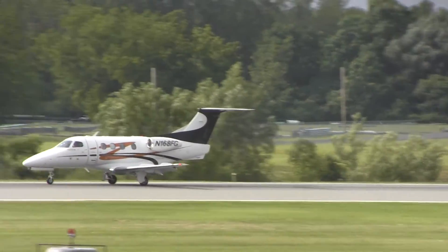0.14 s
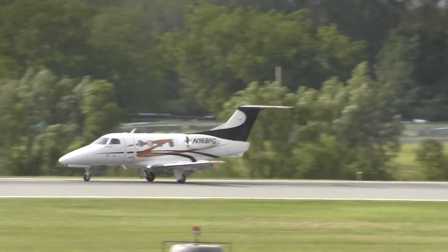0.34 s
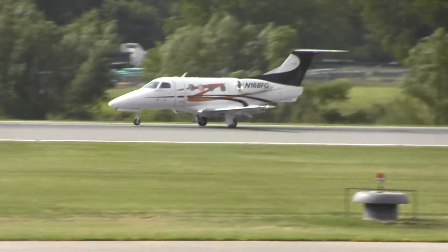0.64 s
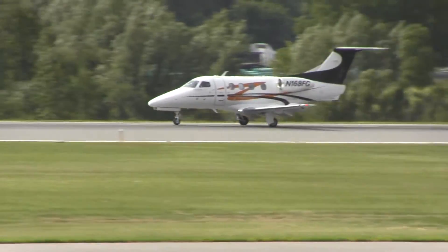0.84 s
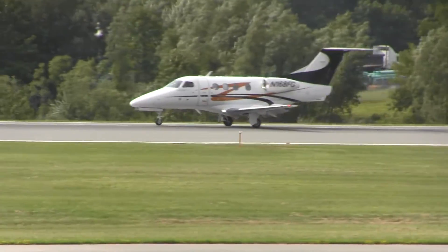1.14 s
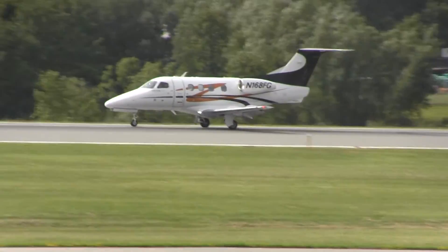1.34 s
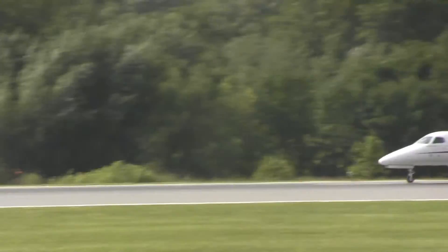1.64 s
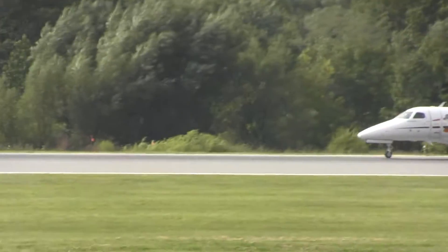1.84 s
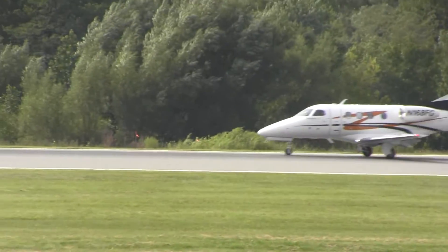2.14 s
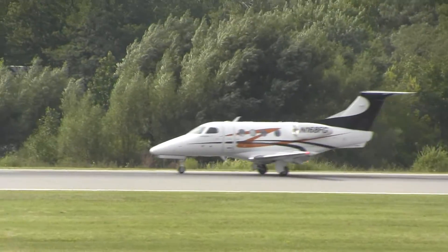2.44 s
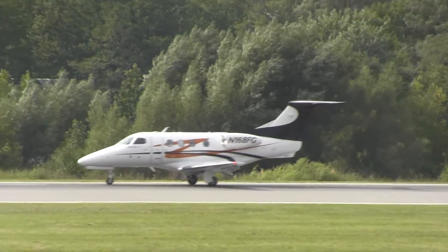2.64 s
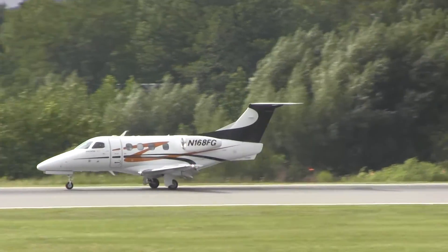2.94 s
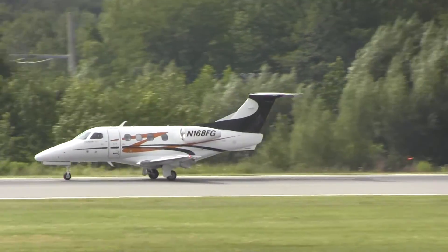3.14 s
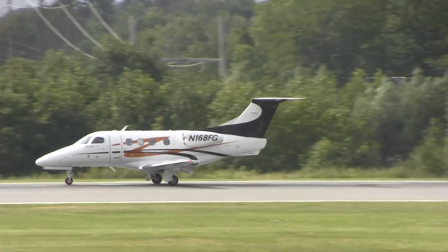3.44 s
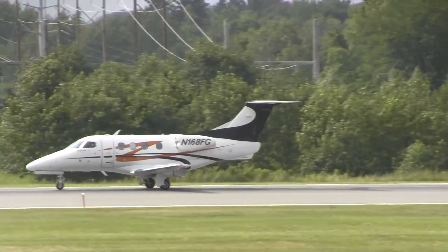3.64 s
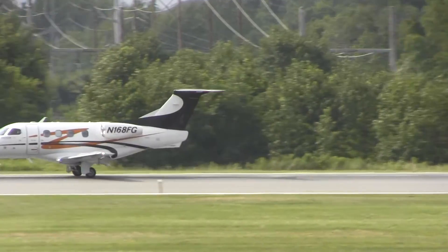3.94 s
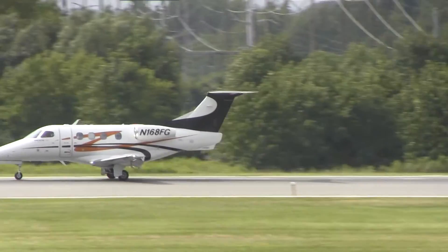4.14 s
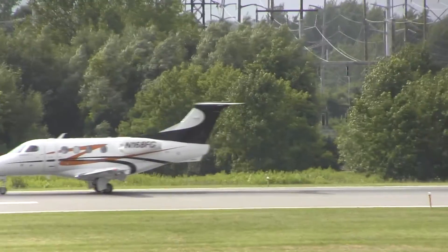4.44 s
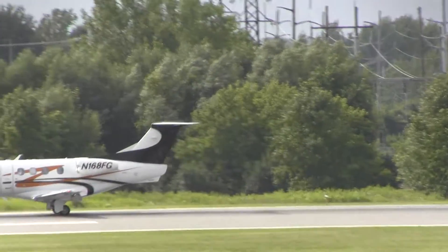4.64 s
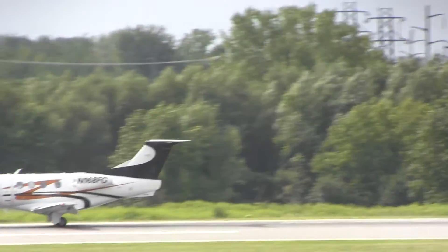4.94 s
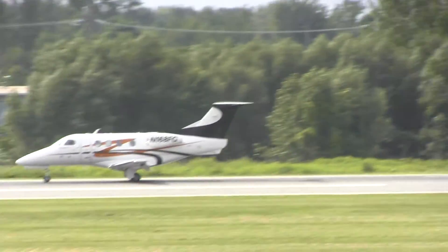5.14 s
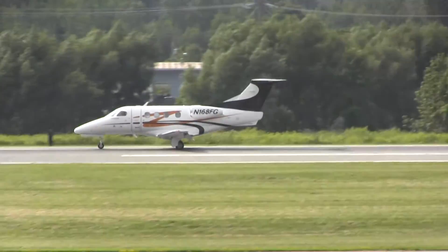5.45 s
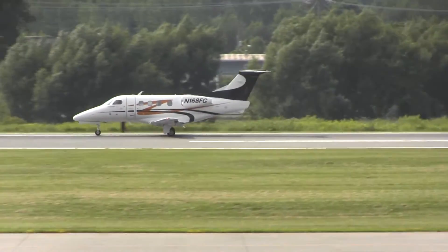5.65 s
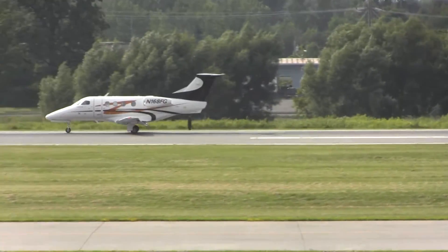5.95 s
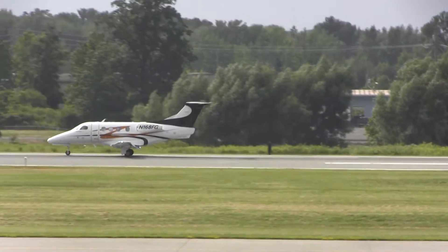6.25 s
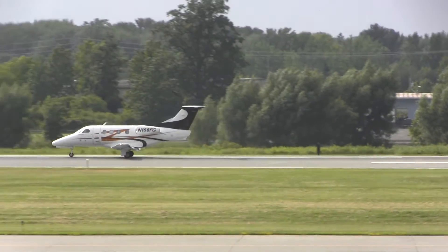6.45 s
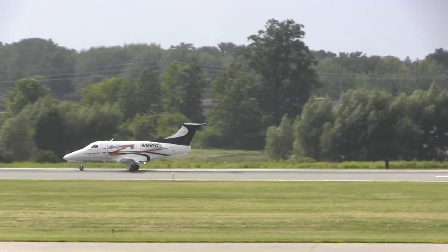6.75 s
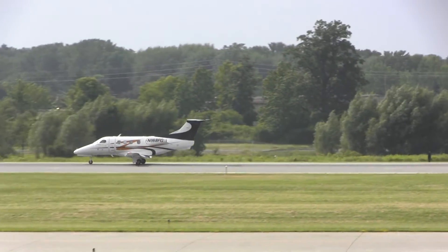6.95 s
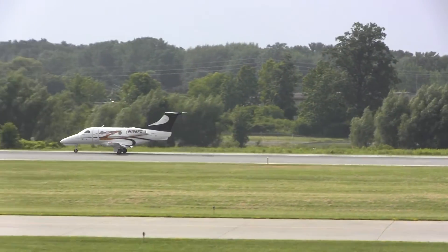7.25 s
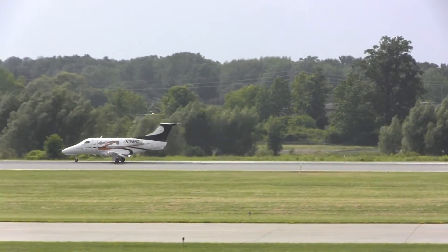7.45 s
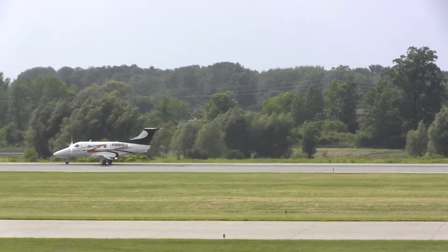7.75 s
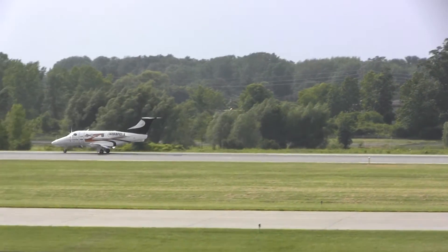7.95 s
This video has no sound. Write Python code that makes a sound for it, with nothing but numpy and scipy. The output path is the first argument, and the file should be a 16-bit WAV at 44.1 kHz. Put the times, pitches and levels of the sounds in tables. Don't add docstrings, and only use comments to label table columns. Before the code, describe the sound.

A small twin jet rolls away along a runway, heard across open grass through a stereo camera microphone. From 0 to 1.6 seconds its fan roar is faint and airy beneath low wind rumble and slight hiss. Around 1.8 to 2.5 it surges bright and rushing, with a twinkling whine near 5.6 kilohertz, then ebbs by 3.3. Hard wind thumps strike at about 3.6, with a tiny click on the right, and a shorter gust follows near 4.3 as the bass becomes central. The roar gradually recovers, peaking around 5.9 with a piercing, fluttering whine, now slightly lower. From 6.3 to 6.7 the heaviest gusts pound and snap, with another faint right click. The jet dips around 7.2, then its roar and whine swell again, shimmering until the cut at about 8.1, over lighter buffeting.

```python
import sys
import numpy as np
from scipy import signal
from scipy.fft import rfft, irfft, next_fast_len
from scipy.io import wavfile
from scipy.ndimage import map_coordinates

SR = 44100
rng = np.random.default_rng(int(sys.argv[2]) if len(sys.argv) > 2 else 0)


def unload_audio(sound):
    columns = np.transpose(np.atleast_2d(sound))
    steps = np.round(np.clip(columns, -1, 1) * 32767)
    wavfile.write(sys.argv[1], SR, steps.astype(np.int16))


def gain_from_db(level_db):
    decades = np.asarray(level_db, float) / 20
    return 10 ** decades


N = 356769


def unit(x):
    return x / np.sqrt(np.mean(np.abs(x) ** 2) + 1e-20)


def along(points, hz):
    point_hz, value = np.transpose(points)
    return np.interp(np.log(hz + 1), np.log(point_hz + 1), value)


def curves(rows, t=None):
    s, *columns = np.transpose(rows)
    t = np.arange(N) / SR if t is None else t
    return [np.interp(t, s, column) for column in columns]


def bumps(t, s, half_s):
    return np.exp(-.5 * ((t[:, None] - s) / half_s) ** 2).T


def wobble(rate_hz):
    knots = np.arange(N) * np.clip(rate_hz, 0, 120) / SR
    return map_coordinates(rng.standard_normal(1000), [knots])


def noise(spectrum):
    m = next_fast_len(N)
    gain = gain_from_db(along(spectrum, np.fft.rfftfreq(m, 1 / SR)))
    return unit(irfft(rfft(rng.standard_normal(m)) * gain, m)[:N])


def patches(shape, bins, frames):
    kernel = np.outer(np.hanning(bins), np.hanning(frames))
    return unit(signal.fftconvolve(rng.standard_normal(shape), kernel, "same"))


def filtered(x, cut_hz, kind="low"):
    return signal.sosfiltfilt(signal.butter(2, cut_hz, kind, fs=SR, output="sos"), x)


# low_hz, high_hz
BANDS = [
    (900, 2000),
    (2300, 3400),
    (3500, 5200),
    (6000, 11000),
]
# abeam_db, astern_db
BAND_DB = [
    (-7, -4),
    (-4.5, -6.5),
    (-2, -2),
    (-9.5, -10),
]
# freq_hz, density_db_per_hz
ABEAM = [(290, -63), (500, -15.5), (1100, -3.5), (2100, -6), (2550, -0.5), (3350, -1), (4300, -0.5),
         (5800, -3.5), (6400, -11.5), (7500, -16.5), (8500, -19), (10300, -31), (12500, -48.5),
         (16000, -120)]
# freq_hz, density_db_per_hz
ASTERN = [(290, -55), (550, -23.5), (800, -11), (1300, -10), (2100, -5.5), (2450, 3), (3200, -5),
          (4600, -6), (5600, -7.5), (7200, -22.5), (8300, -23.5), (10200, -33), (12500, -50.5),
          (16000, -120)]
# centre_hz, width_hz, abeam_db, astern_db
DUCT = [(1293, 75, 2, 8), (1940, 36, 0.5, 0.5), (2434, 50, 1, 1.5), (6740, 70, 3, 6), (2248, 107, -3, -10),
        (2620, 120, 4, -3.5), (3804, 160, 4.5, 1.5), (3580, 83, -1.5, 3), (4560, 130, 3, 1.5)]
# freq_hz, level_db
SPREAD = [(1500, -34), (2350, -20), (3300, -28), (5700, -23.5), (7300, -25.5), (8300, -13), (9800, -15),
          (11500, -26)]
# time_s, astern_share (0-1)
TURN = [
    (3.1, 0.23),
    (4.9, 0.79),
]
# time_s, bass_share (0-1), middle_share (0-1)
FOLD = [
    (4.12, 0, 0),
    (4.25, .95, 0),
    (6.65, .95, 0),
    (6.75, .95, .7),
]


def roar():
    hz, t, z = signal.stft(rng.standard_normal((2, N)), SR, nperseg=512, noverlap=384)
    hz = hz[:, None]
    astern = curves(TURN, t)[0]
    colour_db = along(ABEAM, hz) * (1 - astern) + along(ASTERN, hz) * astern
    for centre_hz, width_hz, abeam_db, astern_db in DUCT:
        peak_db = abeam_db * (1 - astern) + astern_db * astern
        colour_db = colour_db + peak_db * np.exp(-.5 * ((hz - centre_hz) / width_hz) ** 2)

    power = gain_from_db(2 * colour_db)
    band_db = [10 * np.log10(np.mean(power * ((hz >= lo) & (hz < hi)), axis=0)) for lo, hi in BANDS]
    fade_db = np.array(BAND_DB) @ [1 - astern, astern] - band_db
    log_centres = np.log([np.sqrt(lo * hi) for lo, hi in BANDS])
    place = np.interp(np.log(hz[:, 0] + 1), log_centres, np.arange(len(BANDS)))
    below = np.minimum(place.astype(int), len(BANDS) - 2)
    rise_db = fade_db[below + 1] - fade_db[below]
    fade_db = fade_db[below] + (place - below)[:, None] * rise_db

    scatter_db = 1.88 * patches(colour_db.shape, bins=10.6, frames=23.7)
    scatter_db = scatter_db + 0.85 * patches(colour_db.shape, bins=71, frames=12.3)
    gain = gain_from_db(colour_db + fade_db + path(hz, t) + scatter_db - 1.64)
    fan_db = (1 - 5 * astern) * (hz > 4000) * (hz < 7300)
    width = gain_from_db(along(SPREAD, hz) + fan_db) * (1 - curves(FOLD, t)[1] * (hz < 6400))
    return signal.istft(z * [gain, gain * width], SR, nperseg=512, noverlap=384)[1][:, :N]


# time_s, pitch_hz
BLADE_HZ = [(0, 5655), (.6, 5636), (1.8, 5599), (2.2, 5585), (3, 5543), (3.8, 5503), (4.6, 5481),
            (5.8, 5441), (6.2, 5413), (7, 5390), (8.09, 5355)]
# blade_tone_multiple, abeam_db, astern_db (over the high fan band), blur_hz
SIDEBANDS = [(.9555, -20, -24, 12), (1.0445, -27, -27, 12), (.765, -14, -18, 45), (1.2345, -36, -27, 30),
             (1.469, -29, -29, 60)]


def whine():
    def twinkle(steady, rate_hz, scatter=1):
        return unit(steady + scatter * (wobble(rate_hz) + 1j * wobble(rate_hz)))

    hz = curves(BLADE_HZ)[0]
    phase = 2 * np.pi * np.cumsum(hz) / SR
    band = gain_from_db(arriving(hz.mean()))
    astern = curves(TURN)[0]
    tone = flares() * twinkle(1, 95, 0.36 - 0.25 * astern) * np.exp(1j * phase)
    for multiple, abeam_db, astern_db, blur_hz in SIDEBANDS:
        level_db = abeam_db + astern * (astern_db - abeam_db) + 2.5
        sideband = twinkle(0.27, 2 * blur_hz) * np.exp(1j * multiple * phase)
        tone = tone + band * gain_from_db(level_db) * sideband
    return np.array([tone.real, gain_from_db(-28) * tone.imag])


# time_s, half_length_s, peak_db
FLARES = [(0.406, 0.055, -47.5), (0.946, 0.055, -50), (1.402, 0.059, -48.6), (1.616, 0.038, -46),
          (1.8, 0.055, -33.5), (1.911, 0.061, -40), (1.976, 0.012, -29), (2.036, 0.03, -31.5),
          (2.19, 0.052, -34), (2.325, 0.062, -45), (2.405, 0.012, -28.5), (2.51, 0.023, -36),
          (2.6, 0.025, -39), (2.719, 0.059, -41.4), (2.965, 0.055, -34), (3.457, 0.055, -51),
          (3.936, 0.059, -39.5), (4.163, 0.055, -49), (4.405, 0.06, -47), (4.702, 0.069, -41),
          (4.909, 0.055, -48), (5.23, 0.055, -43), (5.368, 0.018, -48), (5.502, 0.038, -39),
          (5.618, 0.013, -33), (5.675, 0.014, -31), (5.735, 0.013, -28), (5.797, 0.013, -25.5),
          (5.867, 0.012, -24.5), (5.882, 0.047, -41), (6.006, 0.013, -30), (6.066, 0.018, -29.5),
          (6.175, 0.01, -33), (6.22, 0.049, -29), (6.276, 0.012, -33), (6.325, 0.02, -36),
          (6.44, 0.013, -44), (6.49, 0.011, -27), (6.45, 0.03, -38), (6.538, 0.01, -31.5),
          (6.595, 0.012, -33), (6.695, 0.035, -36), (6.81, 0.038, -39), (6.882, 0.011, -36),
          (6.955, 0.047, -41.5), (7.022, 0.018, -36), (7.11, 0.018, -41), (7.17, 0.023, -36.5),
          (7.27, 0.022, -39), (7.31, 0.014, -39), (7.37, 0.013, -34), (7.47, 0.028, -31.5),
          (7.62, 0.063, -28.5), (7.67, 0.01, -30), (7.752, 0.052, -30), (7.91, 0.042, -27.5),
          (7.987, 0.036, -27.5), (8.066, 0.026, -20.5)]
DROPOUTS = [2.09, 2.105, 2.465, 5.76, 6.11, 6.23, 6.56, 6.635, 6.74, 7.06, 7.22, 7.35, 7.4, 7.52, 7.55,
            7.74, 7.8, 8.03]


def flares(dropout_s=.007, dropout_share=.65):
    t = np.arange(0, N / SR + .01, .002)
    s, half_s, peak_db = np.transpose(FLARES)
    kept = np.prod(1 - dropout_share * bumps(t, np.array(DROPOUTS), dropout_s), axis=0)
    size = kept * (gain_from_db(peak_db) @ bumps(t, s, half_s))
    return curves(np.c_[t, size])[0]


# time_s, roar_db
PATH = [(0.0, -38.5), (1.6, -38.5), (1.9, -21.5), (2.1, -28.5), (2.4, -25), (2.68, -32.5), (3.0, -29.5),
        (3.24, -38), (3.64, -41), (3.92, -40.5), (4.56, -35), (4.72, -33), (5.04, -38.0), (5.52, -33.5),
        (5.88, -26), (7.16, -38.5), (7.64, -28.5), (8.08, -27.5)]
# time_s, half_length_s, gain_db,
# centre_hz
LENSES = [(0.2, 0.18, -4.5, 5720.0), (0.48, 0.033, 9, 11000.0), (0.533, 0.07, 4.5, 2400),
          (0.92, 0.27, -3.4, 4660), (1.563, 0.061, 4, 1930), (1.78, 0.07, -6, 2410), (1.86, 0.1, -8.5, 990),
          (2.35, 0.18, -3.5, 8600), (2.584, 0.1, 4, 1250), (3.016, 0.03, -1, 1010),
          (3.538, 0.066, 7.5, 1080), (3.898, 0.081, 5, 4560), (4.283, 0.043, 6.5, 1010),
          (4.38, 0.027, -3.5, 2390.0), (4.535, 0.2, -8.5, 980), (5.38, 0.074, 4.5, 990),
          (5.768, 0.072, 8.5, 1000.0), (6.014, 0.091, 4, 1240.0), (6.245, 0.053, 3.5, 2930),
          (6.74, 0.059, 2.5, 1010), (6.858, 0.14, -3.5, 4380), (6.96, 0.061, -2.5, 2390.0),
          (6.99, 0.035, 7, 1000.0), (7.39, 0.062, -4, 2370), (7.74, 0.22, -7.5, 1000.0),
          (7.852, 0.12, -4, 8700), (8.08, 0.078, -2.5, 1000.0),
          (2.4, 0.14, -4, 796),
    (2.95, 0.054, 8, 760),
]
# time_s, gain_db, centre_hz
GLINTS = [(1.9, -4.5, 1920.0), (2.2, 8, 2970.0), (2.22, -2, 1010), (2.52, -1.5, 4600.0), (2.92, -6, 2410),
          (3.12, 9.5, 990), (3.2, -5.5, 3000), (3.66, -6, 3700.0), (4.0, 3, 5720.0), (4.0, 2.5, 1010),
          (4.64, 4.5, 2970.0), (4.745, 5.5, 1900), (4.82, 5.5, 2930), (5.58, -4, 2390.0),
          (5.8, 0.5, 5720.0), (5.92, -4.5, 4640), (6.1, -2, 3700.0), (6.26, -3.5, 1000.0),
          (6.46, -2, 2390.0), (6.5, 0, 1000.0), (6.58, -5.5, 1000.0), (6.6, 8, 2390.0), (7.68, 4.5, 3060),
          (7.9, 5, 1240.0), (7.98, 3, 4600.0)]
# time_s, half_length_s, gain_db, centre_hz
NARROW_LENSES = [(0.157, 0.055, 4, 1610), (0.58, 0.12, 4, 970), (1.196, 0.024, 6.5, 1400),
                 (1.387, 0.13, 1.5, 3450), (1.834, 0.03, -2, 2610), (2.026, 0.053, 4, 3020),
                 (2.171, 0.054, 6.5, 770), (2.357, 0.04, 5, 2020), (2.403, 0.03, -3, 860),
                 (2.426, 0.03, 3.5, 5220), (2.583, 0.16, 3.5, 1310), (2.699, 0.088, 2.5, 7390),
                 (2.868, 0.021, 7, 3000), (2.99, 0.028, 4, 5600), (3.059, 0.062, -3.0, 1490),
                 (3.14, 0.063, -3, 7390), (3.199, 0.074, 2, 3450), (3.245, 0.056, 9, 980),
                 (3.431, 0.03, 7, 1610), (3.587, 0.03, 5, 1980), (3.715, 0.11, -6, 980),
                 (3.878, 0.03, 5.5, 3040), (4.052, 0.05, 3.5, 1400), (4.58, 0.036, -3.5, 6000),
                 (4.673, 0.028, -2, 2270), (4.766, 0.033, 4, 1970), (4.824, 0.055, -2.5, 5600),
                 (4.969, 0.021, -9, 2120), (5.172, 0.011, 5, 2440), (5.66, 0.028, -2.5, 5220),
                 (5.915, 0.078, 4, 5220), (6.136, 0.03, -6, 1140), (6.147, 0.027, -1.5, 3690),
                 (6.171, 0.045, 4, 1850), (6.194, 0.058, 8.5, 814), (6.287, 0.045, 4.5, 9750),
                 (6.362, 0.03, 5, 2300), (6.623, 0.19, -2, 4800), (6.774, 0.033, 5.5, 1500),
                 (6.879, 0.026, -3, 3690), (7.059, 0.056, -3.5, 6890), (7.105, 0.05, 3, 2610),
                 (7.14, 0.097, 8.5, 770), (7.587, 0.14, 1.5, 1850), (8.005, 0.03, 3.5, 1420),
                 (8.017, 0.08, 3, 5170)]
# time_s, gain_db
FLICKERS = [(0.414, 2.5), (2.574, 2), (3.635, -1), (3.662, -3), (4.6, -3.0), (4.769, -3.5), (5.248, 1.5),
            (5.976, 1), (6.026, -3.5), (6.74, -3.0), (6.904, -2.5), (7.224, -1.5), (7.583, -2.4)]


def path(hz, t, glint_s=0.033, flicker_s=0.011, wide_octaves=0.68, narrow_octaves=0.28):
    wide = LENSES + [(s, glint_s, gain_db, centre_hz) for s, gain_db, centre_hz in GLINTS]
    s, gain_db = np.transpose(FLICKERS)
    fan = hz > BANDS[0][1]
    level_db = curves(PATH, t)[0] + fan * (gain_db @ bumps(t, s, flicker_s))
    for pockets, octaves in ((wide, wide_octaves), (NARROW_LENSES, narrow_octaves)):
        s, half_s, gain_db, centre_hz = np.transpose(pockets)
        region = np.exp(-.5 * (np.log2((hz + 1) / centre_hz) / octaves) ** 2)
        level_db = level_db + (region * gain_db) @ bumps(t, s, half_s)
    return level_db


def arriving(hz):
    t = np.arange(0, N / SR + .01, .005)
    return curves(np.c_[t, path(hz, t)])[0]


# freq_hz, density_db_per_hz
LOW_COMMON = [(30, -41), (70, -2), (130, -1.5), (220, -6), (330, -10), (500, -14), (1500, -120)]
# freq_hz, density_db_per_hz
LOW_APART = [(20, -22), (50, -2.5), (110, 8), (180, -3.5), (280, -12), (450, -20), (1500, -120)]
# freq_hz, density_db_per_hz
HIGH_WIND = [(150, -39), (280, -6.5), (400, -5.5), (700, -3), (1100, -7), (1800, -20.5), (5000, -120)]
# time_s, bass_cut (0-1), unlike_bass_db, unlike_upper_db (both over the common wind)
WIND_FILTER = [(0, 0.74, -2.5, -14), (3.5, 0.56, 13.5, -16.5), (3.61, 0.45, 18.5, 9),
               (3.76, 0.32, 13.5, -9), (4.12, 0.31, 11, -13), (4.28, 0.91, -54, -20), (4.6, 0.78, -57, -36),
               (6.15, 0.53, -33, -11), (6.3, 0.92, -33, -13), (6.62, 0.71, -36, -5), (6.72, 1, -59, -37),
               (8.09, 1, -58, -48)]


def buffet(lump_db=2.5, cut_hz=130, fine_db=-12.5, rumble_follows=0.32):
    lumps = gain_from_db(lump_db * wobble(55) + 1.96 * wobble(13))

    def lumpy(spectrum, power):
        return unit(lumps ** power * noise(spectrum))

    gust = gusts(swing=0.83)
    unlike = gusts(swing=2.7)
    cut, low_db, high_db = curves(WIND_FILTER)
    swing_db = arriving(700)
    rumble_db = np.interp(curves(TURN)[0], [0, 1], (-43, -57))
    rumble_db = rumble_db + rumble_follows * (swing_db - swing_db.mean())

    low = gust * lumpy(LOW_COMMON, 0.93)
    mid = low - np.clip(cut, 0, 1) * filtered(low, cut_hz)
    mid = mid + gust * gain_from_db(fine_db) * lumpy(HIGH_WIND, 1.0)
    mid = mid + gain_from_db(rumble_db) * noise(HIGH_WIND)
    mid = mid + unlike * gain_from_db(low_db - 9.0) * lumpy(LOW_APART, 0.94)
    side = gain_from_db(low_db - 3.5) * lumpy(LOW_APART, 0.94) + gain_from_db(high_db) * lumpy(HIGH_WIND, 2.15)
    return np.array([mid, unlike * side])


# time_s, strength_db
GUST = [(0, -42), (1.73, -50), (2.3, -43.5), (3.13, -42), (3.25, -51), (3.55, -47), (3.61, -41),
        (3.75, -47), (4.2, -48.5), (4.31, -32), (4.55, -47.5), (5.58, -53), (5.74, -42.5), (6.19, -53),
        (6.29, -29.5), (6.58, -25.5), (6.85, -38), (8.08, -34.5)]
# time_s, half_length_s, gain_db
PUFFS = [(.05, 0.078, -3.5), (0.495, 0.039, 3.5), (0.718, 0.05, -2.5), (1.57, 0.07, 3.5),
         (1.76, 0.039, -2.5), (1.953, 0.18, 2.5), (2.492, 0.053, -3), (3.003, 0.047, -5), (3.53, 0.028, -7),
         (4.376, 0.017, -9), (4.65, 0.033, -11), (4.902, 0.17, 6), (5.18, 0.051, -4), (5.973, 0.048, -6),
         (6.45, 0.049, 3.5), (7.28, 0.031, 4), (7.638, 0.11, -11)]


def gusts(swing):
    t = np.arange(0, N / SR + .01, .005)
    s, half_s, gain_db = np.transpose(PUFFS)
    puffs_db = gain_db @ bumps(t, s, half_s)
    return gain_from_db(curves(GUST)[0] + swing * curves(np.c_[t, puffs_db])[0])


# time_s, thump_db, snap_db
EDDY_APART = [(0, 4, -12), (4.15, 5, -2), (4.22, -37, -6), (6.1, -23, -4), (6.24, -2, -2), (6.62, -7, -8),
              (6.66, -47, -18)]


def eddies(table, turns, glide, kink, column, scatter_db=3):
    s, mid_db, hz = np.transpose(table)[:, :, None]
    apart_db = curves(EDDY_APART, s)[column]
    side_db = mid_db + apart_db + scatter_db * rng.standard_normal(s.shape)
    chance = rng.random((len(table), 4))[:, :, None]
    steps = np.arange(-900, 900)
    places = (np.round(s * SR).astype(int) + steps).ravel()
    cycles = hz * steps / SR
    bent = cycles + glide * (2 * chance[:, 2] - 1) * cycles ** 2
    out = []
    for k, level_db in enumerate((mid_db, side_db)):
        bell = gain_from_db(level_db) * np.exp(-(cycles / turns) ** 2)
        swing = bell * np.cos(2 * np.pi * (bent + chance[:, k]))
        swing = swing * (1 + kink * np.cos(2 * np.pi * (1.01 * bent + chance[:, 2 + k])))
        out.append(np.bincount(places, swing.ravel(), N)[:N])
    return np.array(out)


# time_s, peak_db, pitch_hz
THUMPS = [(1.475, -34.5, 154), (1.861, -35, 145), (1.989, -36, 170), (2.06, -31, 152), (2.076, -33, 137),
          (2.28, -22, 168), (2.553, -26, 149), (2.643, -26.5, 173), (3.073, -26, 274), (3.116, -35, 137),
          (3.571, -24.5, 161), (3.6, -18, 266), (3.611, -16, 190), (3.619, -12, 223), (3.644, -15.5, 199),
          (3.691, -25.5, 175), (3.737, -30, 165), (3.784, -26.5, 144), (3.854, -28.5, 211), (3.9, -31, 154),
          (3.965, -32.5, 163), (4.077, -31.5, 163), (4.237, -26.5, 198), (4.322, -25.5, 278),
          (4.348, -22, 376), (4.441, -36, 228), (4.483, -30.5, 283), (4.56, -34.5, 215), (4.729, -39, 210),
          (5.759, -37, 186),
          (6.249, -24, 238), (6.303, -19.5, 227), (6.325, -29, 213), (6.348, -24, 272),
           (6.378, -13.5, 216), (6.399, -15, 222), (6.425, -19, 279), (6.443, -25, 284), (6.488, -18, 253),
           (6.512, -17.5, 300), (6.568, -12.5, 212), (6.579, -13, 313), (6.594, -9, 221),
           (6.623, -15.5, 300), (6.639, -17, 229), (6.69, -20, 248), (6.734, -22.5, 298), (6.826, -22, 336),
           (7.014, -27, 314), (7.233, -26, 258), (7.263, -25, 324), (7.295, -25, 246), (7.327, -21.5, 392),
           (7.363, -27, 263), (7.442, -31, 231), (7.631, -28.5, 300), (7.864, -26.5, 252),
           (7.974, -29, 249), (8.011, -28, 240), (8.042, -25, 300)]
# time_s, peak_db, pitch_hz
RIPPLES = [(1.588, -38, 140.0), (1.979, -35, 200.0), (2.155, -43, 150.0), (2.329, -38, 130.0),
           (2.655, -33, 210.0), (2.695, -32, 170.0), (2.816, -30, 210.0), (2.894, -32.5, 149),
           (3.799, -38, 225), (3.869, -33, 200.0), (3.919, -36, 250.0), (4.338, -26, 270.0),
           (4.358, -28, 220.0), (4.431, -31, 230.0), (4.29, -30, 210.0), (5.689, -37, 159),
           (5.76, -37, 180.0), (6.323, -28, 210.0), (6.414, -17.4, 220.0), (6.5, -22, 160.0),
           (6.557, -27, 154), (6.606, -15, 210.0), (6.81, -27.4, 330.0), (6.839, -29, 220.0),
           (6.863, -34, 258), (6.877, -38, 210.0), (6.907, -35, 180.0), (6.971, -37, 310.0),
           (7.028, -29, 310.0), (7.186, -39, 190.0), (7.202, -29, 215), (7.362, -28, 220.0),
           (7.421, -34, 220.0), (7.728, -38, 260.0), (7.781, -32, 350.0), (7.923, -32, 250.0),
           (7.984, -32, 250.0)]
# time_s, peak_db, pitch_hz
SNAPS = [(3.082, -27, 1010), (3.594, -31, 783), (3.605, -23, 684), (3.621, -18, 950), (3.641, -28, 700),
         (3.655, -25, 847), (4.312, -33, 824), (4.322, -29, 710), (4.346, -21, 726), (6.276, -26, 881),
         (6.302, -26, 849), (6.375, -21, 1152), (6.392, -22, 845), (6.399, -24, 882), (6.442, -23, 780),
         (6.484, -30, 750), (6.512, -14.5, 1230), (6.539, -29, 813), (6.583, -24, 740), (6.595, -23, 701),
         (6.625, -27, 730), (6.631, -24, 980), (6.651, -26, 1002), (6.696, -25, 911), (6.828, -28, 930)]


def thumping():
    swings = eddies(THUMPS, turns=0.98, glide=0.28, kink=0.57, column=0)
    swings = swings + eddies(SNAPS, turns=0.96, glide=0.2, kink=0.16, column=1)
    swings = swings + eddies(RIPPLES, turns=0.97, glide=0.27, kink=0.62, column=0)
    swings = filtered(swings, 85, "high")
    swings[1] -= curves(FOLD)[0] * filtered(swings[1], 220)
    return swings


# time_s, level_db
TICKS = [
    (3.6253, -35),
    (6.5949, -26),
]


def ticks(low_hz=11500):
    s, level_db = np.transpose(TICKS)
    click = np.bincount(np.round(s * SR).astype(int), gain_from_db(level_db), N)
    high_pass = signal.butter(2, low_hz, "high", fs=SR, output="sos")
    return np.array([0 * click, signal.sosfilt(high_pass, click)])


# time_s, level_db
HISS = [(0, -79.5), (1.7, -80), (3.1, -81), (3.6, -85), (6.6, -86), (7.3, -88), (7.7, -93)]


def hiss():
    floor = [(200, 18), (1000, 14), (2500, 8), (5000, 2), (10000, 0)]  # freq_hz, density_db_per_hz
    mid, side = gain_from_db(curves(HISS)[0] + 14.5) * np.array([noise(floor), noise(floor)])
    for share, cut_hz in zip(curves(FOLD), (450, 3000)):
        side = side - share * filtered(side, cut_hz)
    return np.array([mid + side, mid - side])


def scene():
    mid, side = roar() + whine() + buffet() + thumping()
    return np.array([mid + side, mid - side])


def band_limit(x):
    return signal.sosfilt(signal.butter(12, 15740, fs=SR, output="sos"), x)


def record(dry):
    x = dry + hiss() + ticks()
    x = x / (1 + np.abs(x / .68) ** 6) ** (1 / 6)
    return band_limit(x)


dry = scene()
out = record(dry)
unload_audio(out)
```